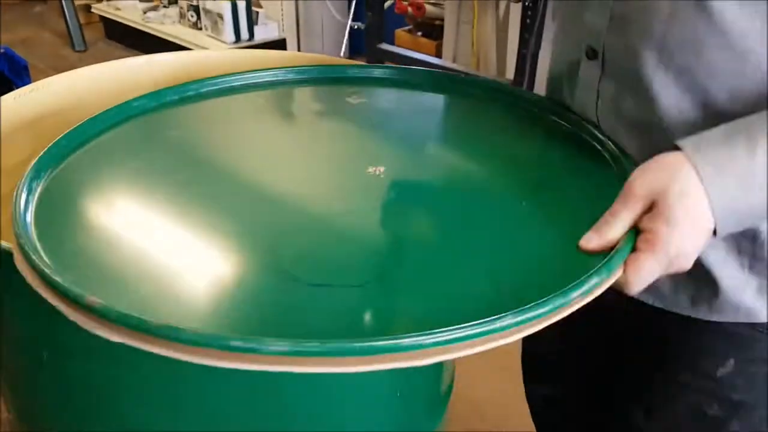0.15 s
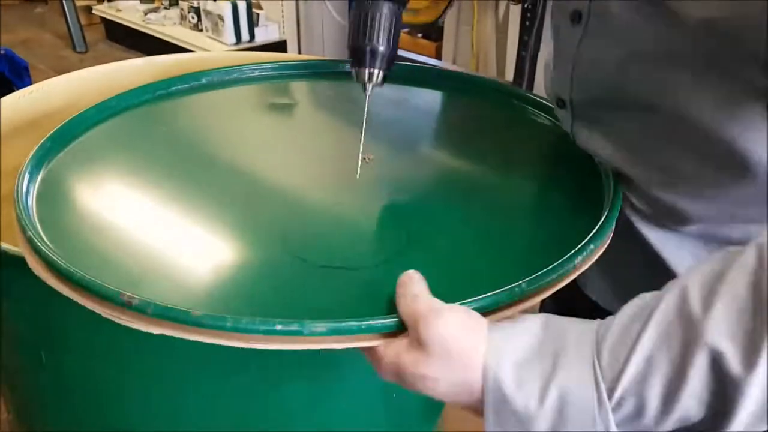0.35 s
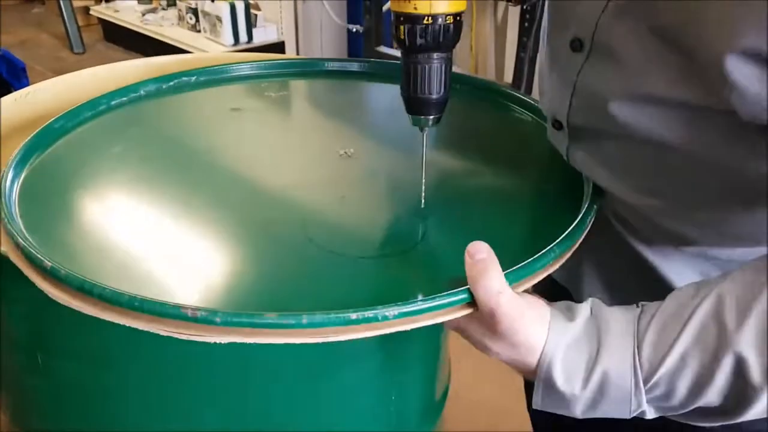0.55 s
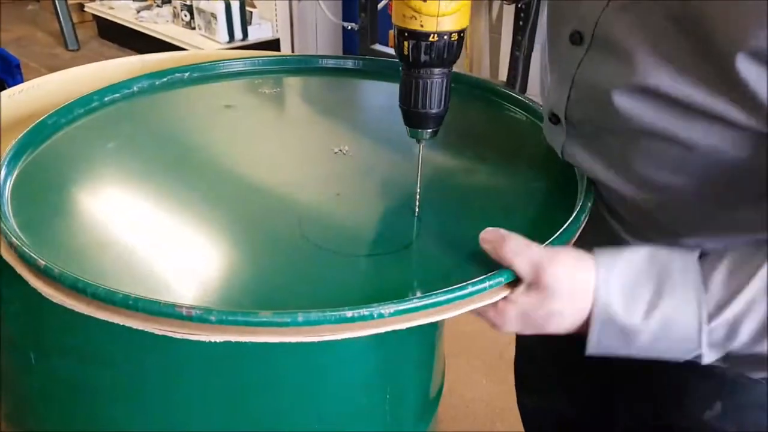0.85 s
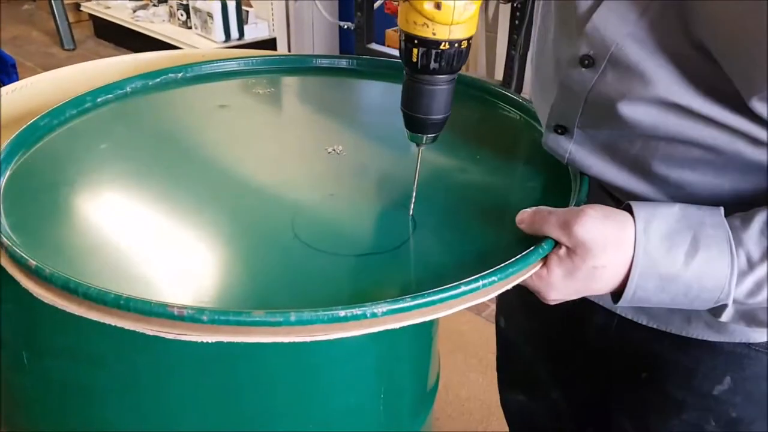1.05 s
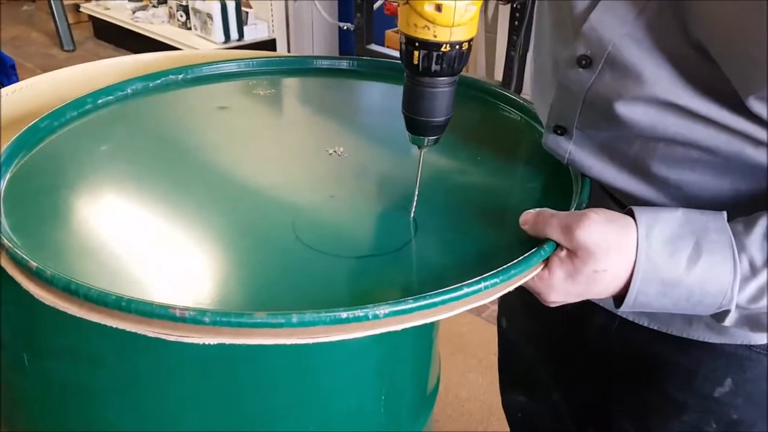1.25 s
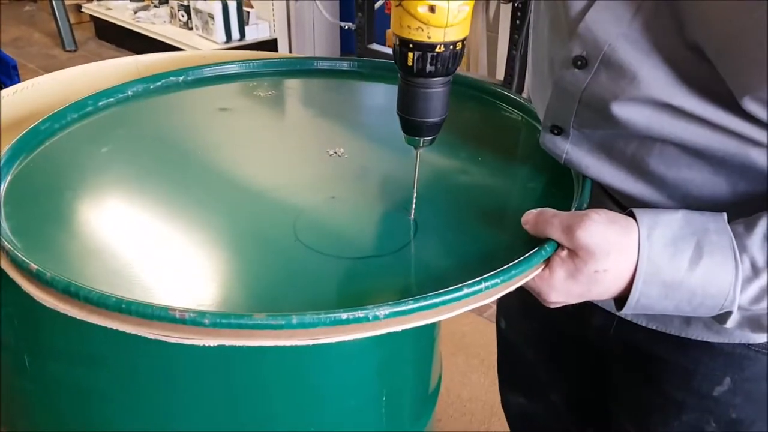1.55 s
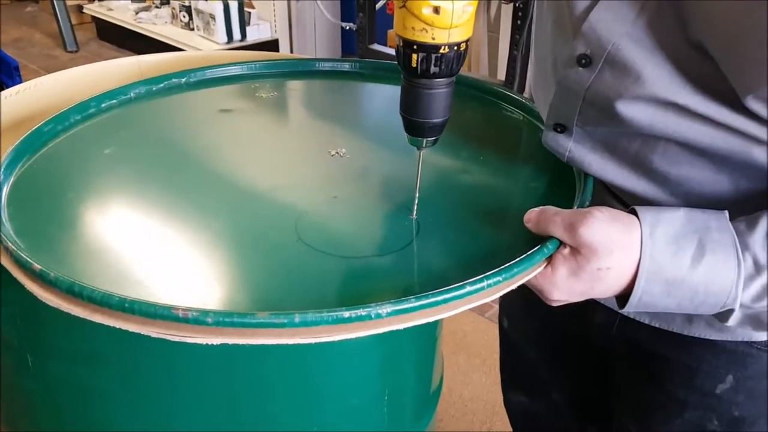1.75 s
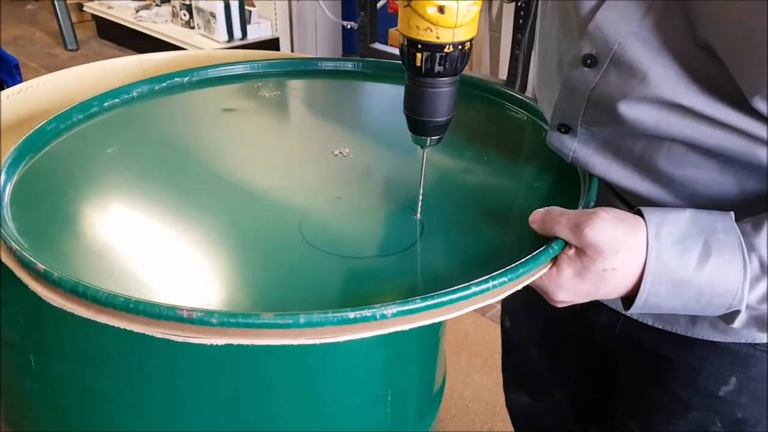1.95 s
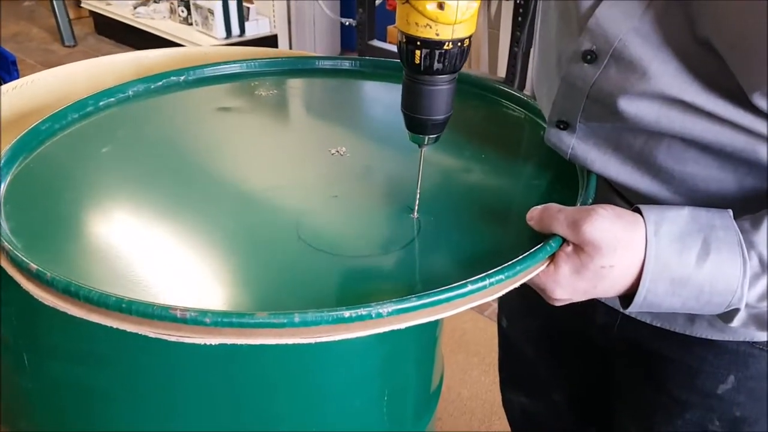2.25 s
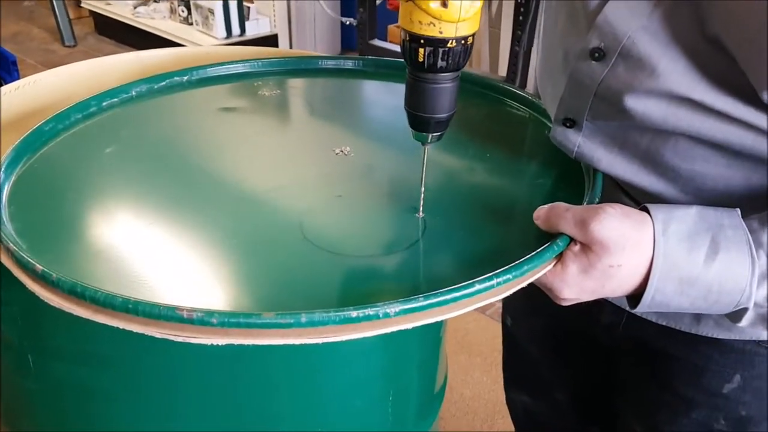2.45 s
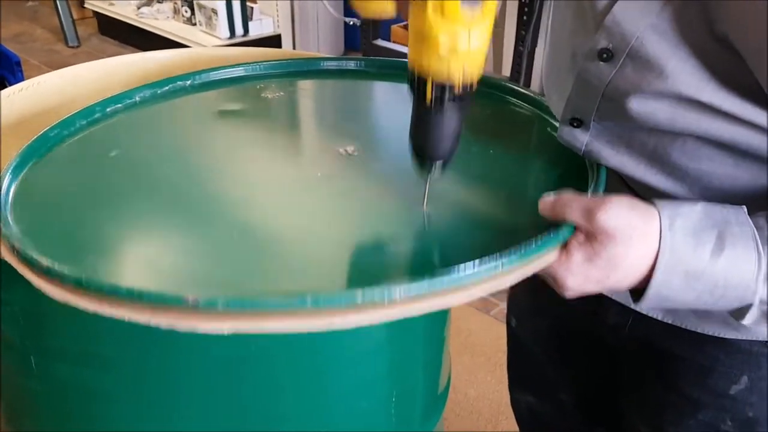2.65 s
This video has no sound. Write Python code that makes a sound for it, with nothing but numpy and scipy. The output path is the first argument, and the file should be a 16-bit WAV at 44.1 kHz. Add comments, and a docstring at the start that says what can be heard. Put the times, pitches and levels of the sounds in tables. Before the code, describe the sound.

A cordless drill whines and squeals through a thin steel lid, breaking through with a clang.

```python
"""A cordless drill bores a pilot hole through a drum's thin steel lid, close to a stereo microphone.
First a sleeve sweeps past and a hand settles on the rim. The motor spins up and sags under load, its
gears whining while the bit scrapes and squeals. The bit breaks through, the chuck slams on the lid
and the drum rings. Behind it all lies the quiet room tone of a workshop."""
import sys
import numpy as np
from scipy import signal
from scipy.fft import rfft, irfft
from scipy.io import wavfile
from scipy.ndimage import uniform_filter1d

SR = 44100
rng = np.random.default_rng(int(sys.argv[2]) if len(sys.argv) > 2 else 0)


def master(y):
    """Save y as 16-bit WAV."""
    cut = np.clip(np.atleast_2d(y).T, -1, 1)
    pcm = np.round(cut * 32767)  # scale
    wavfile.write(sys.argv[1], SR, pcm.astype(np.int16))


N = 123479

# gear whine, following motor speed: (time [s], pitch [Hz])
WHINE_PITCH = [(1.0, 300.1), (1.06, 560.6), (1.09, 701.9), (1.11, 775.8), (1.142, 842.1), (1.192, 880.5),
               (1.238, 887.3), (1.296, 873.8), (1.5, 856.8), (1.872, 826), (2.0, 826.6), (2.24, 814.2),
               (2.348, 797), (2.46, 787.7), (2.52, 798.7), (2.566, 865), (2.63, 878), (2.7, 851)]
# fundamental of the whine: (time [s], relative level [dB])
WHINE_LEVEL = [(1.06, -65), (1.13, -52.5), (1.2, -50.5), (1.236, -58), (1.35, -51.5), (1.49, -54),
               (1.53, -57), (1.72, -51), (1.81, -45.5), (1.98, -49.5), (2.2, -49.5), (2.36, -53),
               (2.69, -53.5)]
# gear mesh: (time [s], relative level [dB])
MESH_LEVEL = [(1.04, -60), (1.087, -46.5), (1.144, -54), (1.3, -45.5), (1.72, -49.5), (1.88, -45.5),
              (2.22, -46.5), (2.45, -54.5), (2.602, -47.5), (2.69, -49)]
# rotor hum: (time [s], relative level [dB])
HUM_LEVEL = [(1.09, -76), (1.2, -61), (1.42, -74), (1.6, -62), (2.45, -75), (2.64, -73)]
# other motor tones: (multiple of the whine, relative level running free [dB], under full load [dB])
MOTOR_TONES = [(.774, -75.5, -63), (1.375, -62, -68), (1.688, -69, -70), (2, -60, -63.5), (2.375, -63, -59),
               (3.266, -57, -59), (3.38, -74, -58.5), (6, -53, -47), (6.203, -51.5, -51), (7.508, -67, -66),
               (11.203, -55, -63), (12, -49.5, -47.5), (12.572, -48.5, -53)]
# gear rattle and cutting: (frequency [Hz], relative level [dB])
GRIND_SPECTRUM = [(90, -60), (150, -30), (220, -22.5), (410, -29), (520, -13.5), (590, -28), (730, -23.5),
                  (930, -8), (1060, -21), (1160, -14.5), (1280, -23), (1450, -17), (2320, -16), (2950, -12),
                  (3400, -6), (3800, -10.5), (4550, -8.5), (5320, -2.5), (7310, -7), (10400, -7.5),
                  (12200, -11.5), (15800, -9)]
# chuck and gearbox resonances: (frequency [Hz], nominal width [Hz], level [dB])
HOUSING_MODES = [(634, 11, -70.5), (1730, 40, -65.5), (1935, 100, -55.5), (2434, 38, -59.5),
                 (2635, 23, -58.5), (2798, 66, -63), (5270, 160, -48), (6220, 220, -58), (6170, 550, -45),
                 (10640, 2700, -61)]
# the bit chattering as the hole deepens: (time [s], level [dB])
CHATTER_LEVEL = [(.96, -70), (1.15, -55), (1.5, -41), (1.9, -43.5), (2.24, -42.5), (2.3, -40.5),
                 (2.49, -41.5), (2.57, -45), (2.72, -46)]
# lid and drum: (frequency [Hz], relative level [dB], t60 before damping [s])
LID_MODES = [(176.7, -5.5, 0.83), (227, -2.5, 0.43), (345, 2.5, 0.32), (658, -3, 0.39), (836, 3.5, 0.35),
             (959, 1, 0.41), (1150, -2, 0.79), (1412, 0.5, 0.11), (1524, 0, 0.54), (1667, 2, 0.18),
             (2138, 2.5, 0.31), (2700, 0, 0.21), (3236, -2, 0.22), (3376, 6.5, 0.21), (3650, 1, 0.21),
             (9150, 1, 0.047)]
# the bit snags, breaks through and the chuck lands: (time [s], relative level [dB], treble gain [dB])
BLOWS = [(2.7091, -21.5, -5), (2.714, -24, -6.5), (2.721, -29.5, 5.5), (2.7281, -16.5, -5),
         (2.74, -35, 3.5), (2.754, -27, -7), (2.789, -37, 10)]
# crash of sheet steel: (frequency [Hz], relative level [dB])
CRASH_SPECTRUM = [(35, -72), (60, -48), (160, -36), (215, -10), (280, -11), (345, -4), (663, -13),
                  (856, -3), (1030, -12), (1460, -9), (3020, -16.5), (3310, -17), (3900, -15.5),
                  (8820, -14.5), (15800, -22.5)]
# lid and bit sing as the sheet springs back: (time [s], level [dB], rise [s], t60 [s], pitch [Hz])
SPRING_BACK = [(2.715, -36, 0.0064, 0.27, 237), (2.732, -24, 0.0045, 0.1, 850),
               (2.733, -30.5, 0.017, 0.077, 345), (2.743, -31, 0.0057, 0.21, 3265),
               (2.77, -29, 0.0054, 0.087, 340)]
# sleeve and palm on the lid: (time [s], relative rub level [dB], relative hiss level [dB])
SLIDE_LEVELS = [(0.0, -60.5, -60), (0.038, -57, -58.5), (0.094, -42.5, -39.5), (0.144, -37.5, -33.5),
                (0.23, -43, -41.5), (0.28, -52.5, -63), (0.306, -57, -59.5), (0.352, -52, -51),
                (0.382, -56.5, -60.5), (0.422, -52.5, -50.5), (0.47, -50.5, -52), (0.504, -54.5, -56.5),
                (0.558, -66, -76), (0.612, -61.5, -60.5), (0.64, -64.5, -67), (0.676, -76, -81),
                (0.72, -90, -93)]
# rub of the cloth: (frequency [Hz], relative level [dB])
RUB_SPECTRUM = [(60, -70), (125, -54), (230, -5), (390, -21), (560, -3), (780, -9), (1400, 1), (1700, -7),
                (2200, -0.5), (2450, -7.5), (3400, -4.5), (4200, -6.5), (5300, -7), (7300, -9), (9000, -21),
                (15800, -16.5)]
# hiss of the cloth: (frequency [Hz], relative level [dB])
HISS_SPECTRUM = [(4000, -33), (7300, -5.5), (8300, 0), (9700, -2), (12000, -4.5), (15800, -20)]
# soft bumps of hand and drill: (time [s], level [dB], rise [s], t60 [s], centre [Hz])
BUMPS = [(.115, -46, 0.015, 0.093, 620), (0.35, -48.5, 0.021, 0.17, 650), (.4, -54, 0.0056, 0.1, 674),
         (.485, -58.5, 0.014, 0.18, 273), (.622, -61.5, 0.043, 0.22, 796), (0.738, -58.5, 0.0019, 0.1, 980),
         (0.923, -52.5, 0.016, 0.2, 600), (2.32, -51, 0.014, 0.12, 447)]
# light ticks of bit and trigger: (time [s], level [dB])
TICKS = [(0.736, -62.5), (0.917, -60), (0.935, -76), (.948, -55)]
# ticks and tightening grip: (frequency [Hz], relative level [dB])
TICK_SPECTRUM = [(200, -13), (1000, -3), (3000, -3), (6000, -3.5), (9000, -1.5), (15800, -15)]
# workshop room tone: (frequency [Hz], relative level [dB])
ROOM_SPECTRUM = [(20, -38), (130, -31), (175, -4), (240, -8), (380, -1.5), (680, -10.5), (1040, -13.5),
                 (3000, -18.5), (15800, -30.5)]
# likeness of left and right at the microphone: (frequency [Hz], correlation [0-1])
STEREO_LIKENESS = [(40, 0.53), (150, 0.75), (600, 0.72), (1400, 0.72), (2800, 0.64), (5600, 0.51),
                   (11000, 0.23), (15000, 0.23)]
# balance of the work at the microphone: (frequency [Hz], left minus right [dB])
LEFT_LEAN = [(600, 0.6), (1400, 1.5), (2800, 1.5), (5600, 4), (14000, 3.5)]
# microphone rumble: (frequency [Hz], relative level [dB])
MIC_RUMBLE = [(10, -10), (25, 0), (60, -17), (120, -17), (400, -52)]

TRIGGER_S, FADE_IN_S, RELEASE_S, RUN_DOWN_T60_S = 0.96, 0.015, 2.744, 0.35
LOADED_HZ, FULL_SAG_HZ = 828, 89   # the whine's working pitch, and its drop under full load
HUM_ORDER, MESH_ORDER, SQUEAL_ORDER = .398, 5, 6.594   # multiples of the whine
CUTS_PER_CYCLE = .0655   # passes of a cutting edge per cycle of the whine
BIT_DAMPING, CHUCK_DAMPING, HAND_DAMPING = 1.1, 1.3, 2   # each contact divides the lid's t60 by this


def drill():
    """The trigger starts the motor; its speed drives whine, grinding and chatter until it is let go."""
    hz = in_time(WHINE_PITCH) * (1 + 0.0007 * drift(30))
    cycles, speed = np.cumsum(hz) / SR, hz / LOADED_HZ
    load = np.minimum((np.maximum.accumulate(hz) - hz) / FULL_SAG_HZ, 1)
    running = np.clip((clock() - TRIGGER_S) / FADE_IN_S, 0, 1) * hold(RELEASE_S, RUN_DOWN_T60_S)
    return running * (whine(cycles, speed, load) + grind(cycles, speed) + chatter(cycles))


def whine(cycles, speed, load):
    """Gear and motor tones lock to the shaft; load shifts their balance, tooth play smears the highs."""
    def tone(multiple, db):
        stereo_phase = 0.31 * min(multiple / 5, 1) * drift(8) * np.array([[1], [-1]])
        smear = 1 + .04 * multiple * drift(250)
        phase = 2 * np.pi * (multiple * cycles + rng.random())
        wobble = 0.045 * multiple * drift(60)
        return from_db(db) * smear * sine(phase + stereo_phase + wobble)
    main = tone(1, in_time(WHINE_LEVEL) + drift(35))
    main += tone(MESH_ORDER, in_time(MESH_LEVEL) + 0.5 + 1.5 * drift(25))
    main += tone(HUM_ORDER, in_time(HUM_LEVEL) + 1.6 * drift(25))
    others = sum(tone(multiple, free_db + (loaded_db - free_db) * load + 1.6 * drift(25))
                 for multiple, free_db, loaded_db in MOTOR_TONES)
    return main * np.minimum(speed / .7, 1) ** 1.3 + others * speed ** 1.3


def grind(cycles, speed, repeating_share=0.29):
    """Partly repeating tooth rattle and gritty cutting throb with the bit's edges; lid and housing ring."""
    cuts = cycles * CUTS_PER_CYCLE
    teeth = rng.standard_normal((2, 800))
    rattle = rms_one(np.array([np.interp(cuts % 1, np.linspace(0, 1, len(row)), row) for row in teeth]))
    force = np.sqrt(repeating_share) * spread(rattle) + np.sqrt(1 - repeating_share) * noise()
    throb_db = 0.34 * (np.sin(2 * np.pi * cuts) + np.sin(4 * np.pi * cuts))
    grit = rms_one(from_db(throb_db + drift(600)))
    cutting = from_db(-34) * colour(force * grit, GRIND_SPECTRUM)
    ring = from_db(-56.5) * rms_one(lid(noise(), BIT_DAMPING))
    housing = sum(from_db(db) * band(noise() * grit, hz, 2 * width) for hz, width, db in HOUSING_MODES)
    return (cutting + ring) * speed ** 0.83 + housing


def chatter(cycles, catch_s=2.398, depth_db=5.5):
    """Each cutting edge catches with its own strength and draws a short squeal from the bit."""
    cuts = CUTS_PER_CYCLE * (cycles - np.interp(catch_s, clock(), cycles))   # one catch falls on catch_s
    catch_db = depth_db * (np.cos(2 * np.pi * cuts) + 0.39 * np.cos(4 * np.pi * cuts))
    uneven_db = rng.standard_normal(N)[np.round(cuts).astype(int)]
    squeal = sine(2 * np.pi * SQUEAL_ORDER * cycles + 0.57 * drift(80))
    scrape = from_db(-5.5) * band(noise(), hz=5190, width_hz=180)
    return from_db(in_time(CHATTER_LEVEL)) * rms_one(from_db(catch_db + uneven_db)) * rms_one(squeal + scrape)


def breakthrough(split_hz=980):
    """Each blow gives a short dense crash of sheet steel and sets the lid's modes ringing."""
    crash = colour(noise(), CRASH_SPECTRUM)
    low = signal.sosfiltfilt(signal.butter(2, split_hz, fs=SR, output="sos"), crash)
    out = sum(swell(*shape) * sine(2 * np.pi * (hz * clock() + rng.random()))
              for *shape, hz in SPRING_BACK)
    force = np.zeros(N)
    for s, db, treble_db in BLOWS:
        treble = from_db(treble_db) * (crash - low) * decay(s, t60=0.11)
        out = out + from_db(db) * (low * decay(s, t60=0.068) + treble)
        force[int(s * SR)] = from_db(db)
    return out + from_db(-21.5) * lid(force, CHUCK_DAMPING)


def lid(force, damping, low_cut_hz=239):
    """The modes of the lid ring under a force; the thin sheet radiates little bass."""
    ring = 0
    for hz, db, t60 in LID_MODES:
        radius, angle = np.exp(-np.log(1000) * damping / (t60 * SR)), 2 * np.pi * hz / SR
        feedback = [1, -2 * radius * np.cos(angle), radius ** 2]
        ring = ring + from_db(db) * signal.lfilter([0, np.sin(angle)], feedback, force + 1e-18)
    return signal.sosfilt(signal.butter(4, low_cut_hz, "high", fs=SR, output="sos"), ring)


def lid_drone(start_s=2.555, end_s=2.69, hz=226, db=-62):
    """As the tip pushes through, the thinning metal lets the lid hum on a low mode."""
    gate = uniform_filter1d(1. * ((clock() > start_s) & (clock() < end_s)), size=1500)
    return from_db(db + drift(20)) * gate * sine(2 * np.pi * hz * clock())


def sleeve():
    """Cloth and palm slide over the lid, hissing and rubbing its modes into sound."""
    rub_db, hiss_db = in_time(SLIDE_LEVELS, column=1) + 0.2, in_time(SLIDE_LEVELS, column=2) + 1
    grain = rms_one(from_db(0.5 * drift(500)))
    rub = colour(noise() * grain, RUB_SPECTRUM) + from_db(-7) * flexed(lid(noise(), HAND_DAMPING))
    hiss = colour(noise() * grain, HISS_SPECTRUM)
    return (from_db(rub_db) * rub + from_db(hiss_db) * hiss) * hold(SLIDE_LEVELS[-1][0], t60=.3)


def flexed(ring, pitch_share=0.01183):
    """Changing hand pressure bends the sheet, so its resonances wander."""
    bent_time = clock() + pitch_share * np.cumsum(drift(9)) / SR
    return rms_one(np.array([np.interp(bent_time, clock(), channel) for channel in ring]))


def handling():
    """Hand and drill bump softly, bit and trigger tick, and the sleeve shifts as the grip tightens."""
    bumps = sum(swell(*shape) * band(noise(), hz, 0.68 * hz) for *shape, hz in BUMPS)
    grip = swell(s=.918, db=-62, rise=.026, t60=.33)
    ticks = sum(from_db(db) * decay(s, t60=0.13) for s, db in TICKS)
    return bumps + colour(noise(), TICK_SPECTRUM) * (grip + ticks)


def room_tone(db=-68):
    """The workshop's steady background, a faint low noise."""
    return from_db(db) * colour(noise(), ROOM_SPECTRUM)


def from_db(db):
    """Decibels to gain."""
    return 10 ** (np.asarray(db) / 20)


def rms_one(x):
    """Scale to unit rms."""
    return x / np.sqrt(np.mean(x ** 2) + 1e-20)


def sine(phase):
    """A pure tone; rms 1."""
    return np.sqrt(2) * np.sin(phase)


def clock():
    """Time of every sample in seconds."""
    return np.arange(N) / SR


def in_time(rows, column=1):
    """Join a table's points in time by straight lines."""
    columns = np.transpose(rows)
    return np.interp(clock(), columns[0], columns[column])


def per_bin(points):
    """Read a table on a log-frequency axis."""
    hz, value = np.transpose(points)
    return np.interp(np.log(np.arange(N // 2 + 1) * SR / N + 1), np.log(hz), value)


def colour(x, spectrum):
    """Give a sound a spectrum; rms 1."""
    return rms_one(irfft(rfft(x) * from_db(per_bin(spectrum)), N))


def drift(rate_hz):
    """A smooth random wander; rms about 1."""
    knots = rng.standard_normal(N)
    return np.interp(clock() * rate_hz * 2, np.arange(N), knots) * np.sqrt(3 / 2)


def spread(pair):
    """Two unrelated signals become a stereo one, alike in the bass and diffuse in the treble."""
    mid, side = rfft(pair)
    alike = per_bin(STEREO_LIKENESS)
    return irfft(mid + np.sqrt((1 - alike) / (1 + alike)) * side * [[1], [-1]], N)


def noise():
    """Broadband stereo noise."""
    return spread(rng.standard_normal((2, N)))


def band(x, hz, width_hz):
    """Two passes through a resonance, each width_hz wide; rms 1."""
    radius = np.exp(-np.pi * width_hz / SR)
    feedback = [1, -2 * radius * np.cos(2 * np.pi * hz / SR), radius ** 2]
    for _ in range(2):
        x = rms_one(signal.lfilter([1, 0, -1], feedback, x))
    return x


def decay(s, t60):
    """Sudden start at s, then a steady fall in dB."""
    age = clock() - s
    return (age >= 0) * from_db(-60 * np.maximum(age, 0) / t60)


def hold(s, t60):
    """Full level until s, then a steady fall in dB."""
    return np.maximum(clock() < s, decay(s, t60))


def swell(s, db, rise, t60):
    """Level of a soft push: it swells up to s and dies away."""
    return from_db(db) * (decay(s, t60) + (clock() < s) * np.exp(-((clock() - s) / rise) ** 2))


def scene():
    """The work close up, its treble leaning left, over the quiet of the workshop."""
    work = drill() + lid_drone() + sleeve() + handling() + breakthrough()
    balance = from_db(per_bin(LEFT_LEAN) * np.array([[.5], [-.5]]))
    return irfft(rfft(work) * balance, N) + room_tone()


def record(dry):
    """The microphone adds a faint rumble; the top is cut steeply."""
    rumble_db, cutoff_hz = -83.5, 15950
    rumble = from_db(rumble_db) * colour(rng.standard_normal((2, N)), MIC_RUMBLE)
    return signal.sosfilt(signal.ellip(12, .1, 80, cutoff_hz, fs=SR, output="sos"), dry + rumble)


dry = scene()
out = record(dry)
master(out)
```